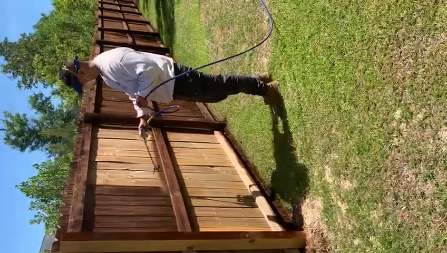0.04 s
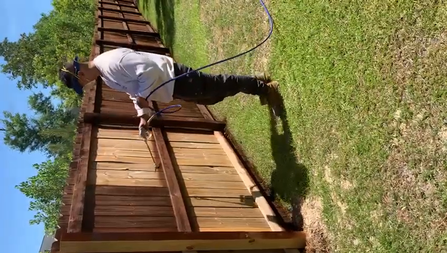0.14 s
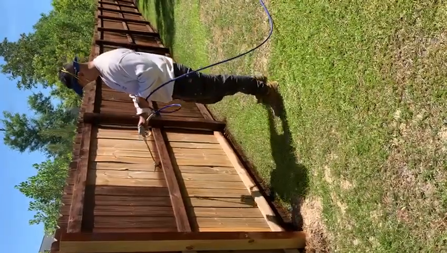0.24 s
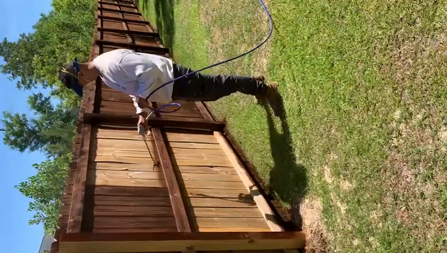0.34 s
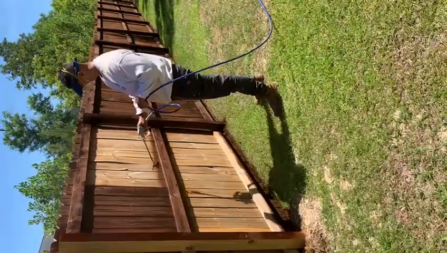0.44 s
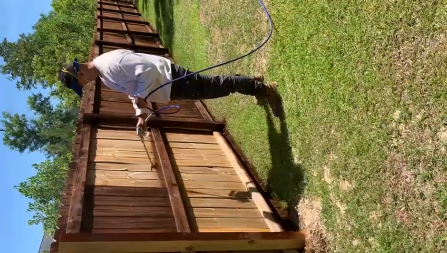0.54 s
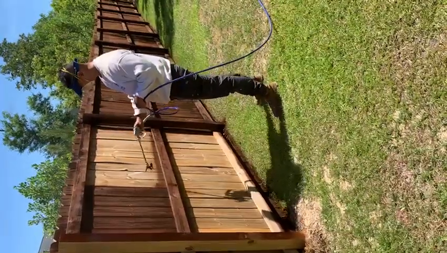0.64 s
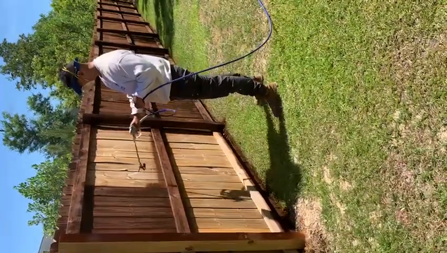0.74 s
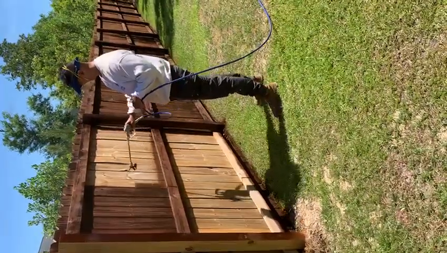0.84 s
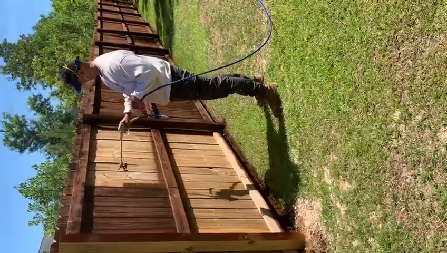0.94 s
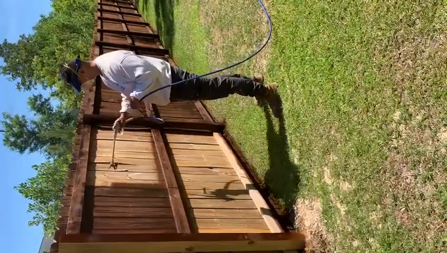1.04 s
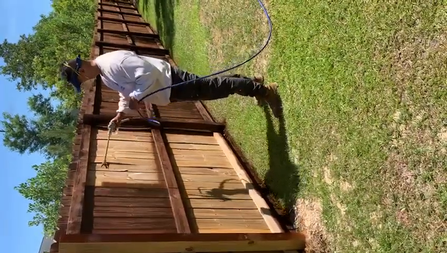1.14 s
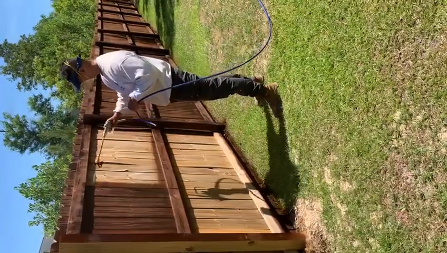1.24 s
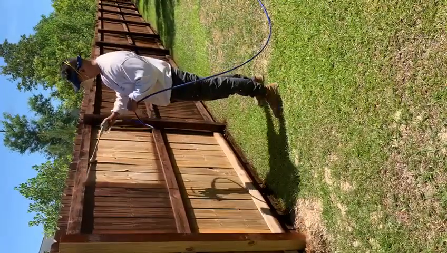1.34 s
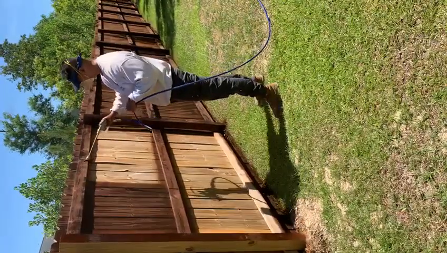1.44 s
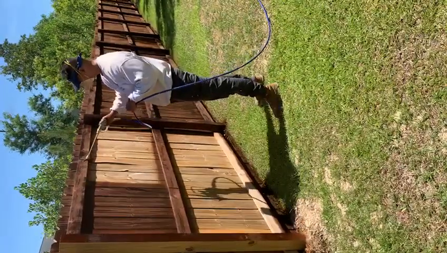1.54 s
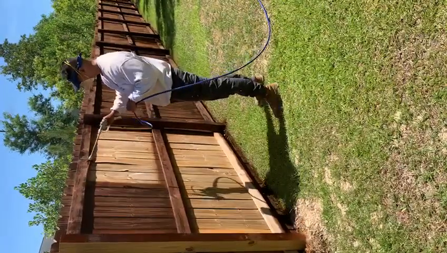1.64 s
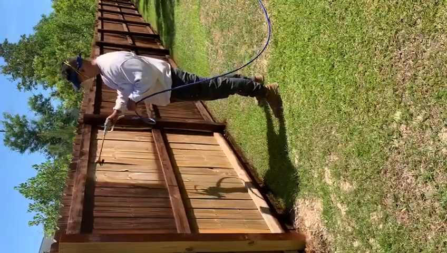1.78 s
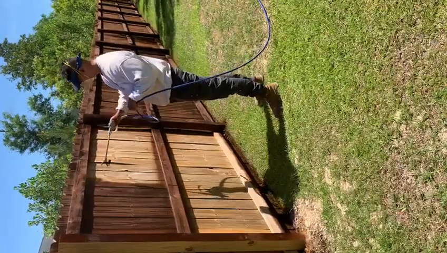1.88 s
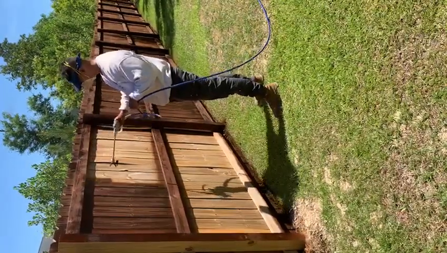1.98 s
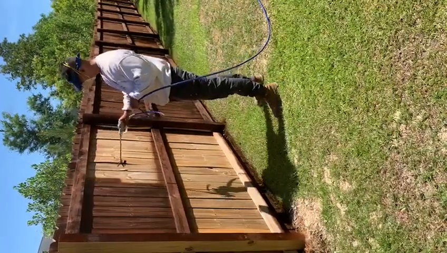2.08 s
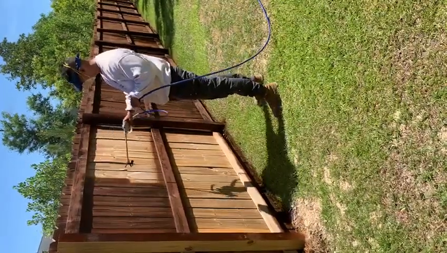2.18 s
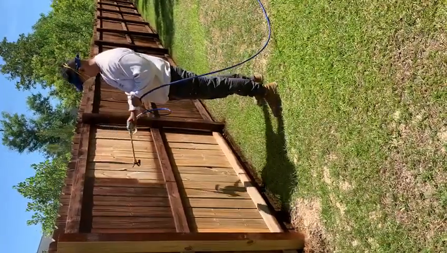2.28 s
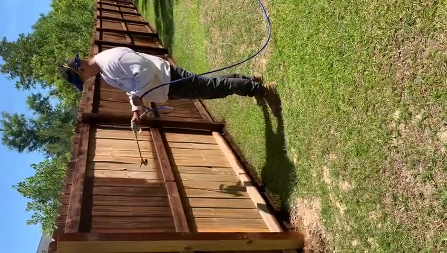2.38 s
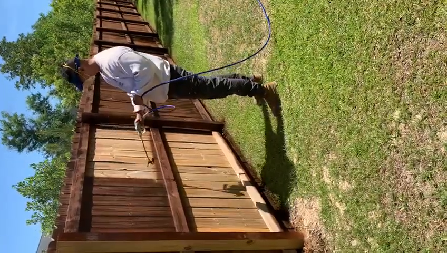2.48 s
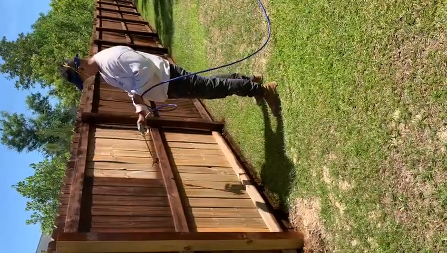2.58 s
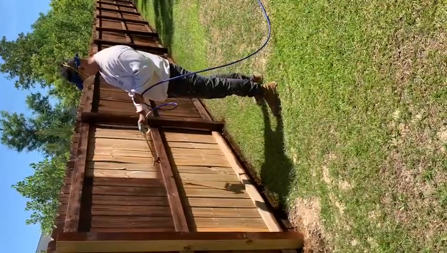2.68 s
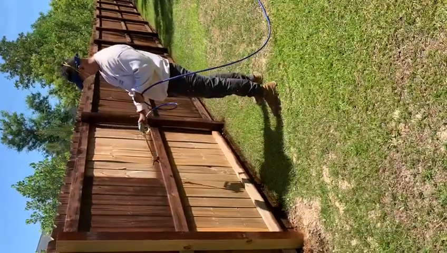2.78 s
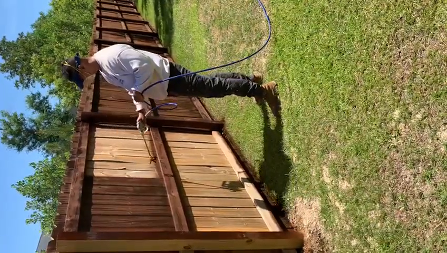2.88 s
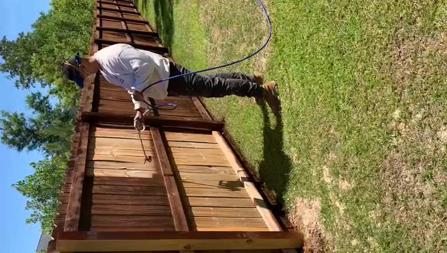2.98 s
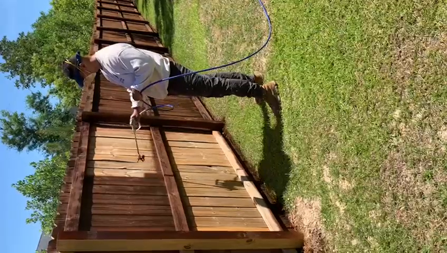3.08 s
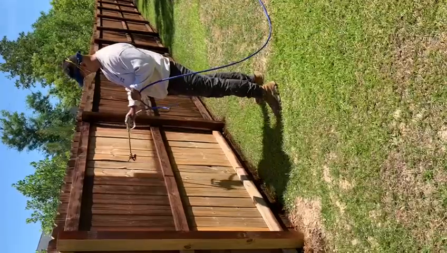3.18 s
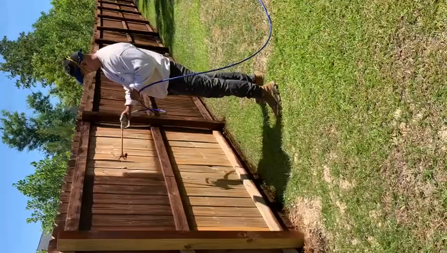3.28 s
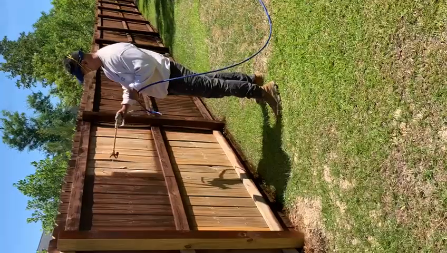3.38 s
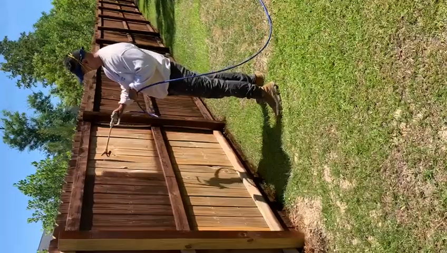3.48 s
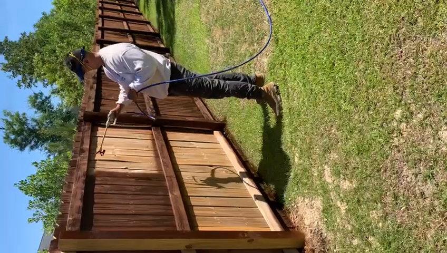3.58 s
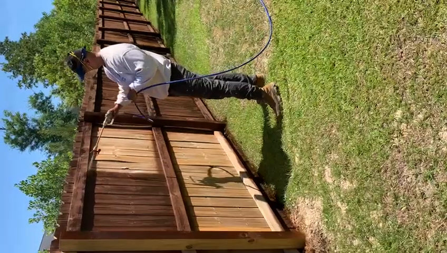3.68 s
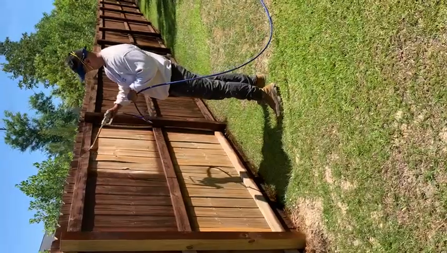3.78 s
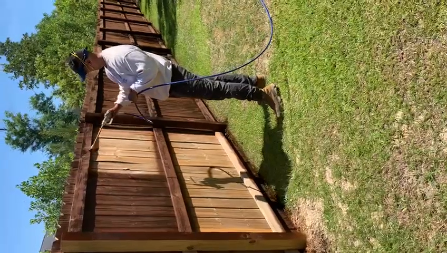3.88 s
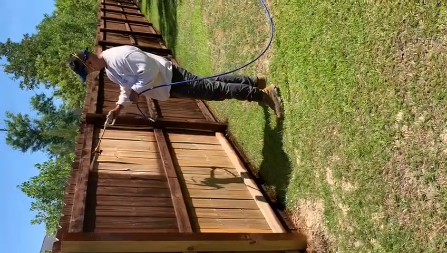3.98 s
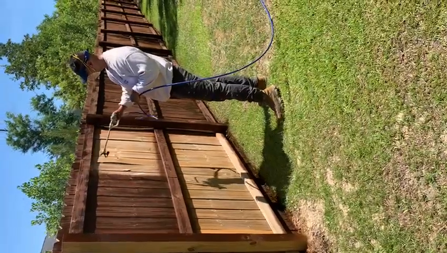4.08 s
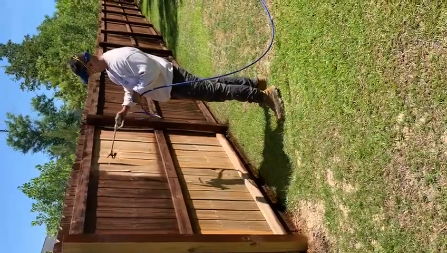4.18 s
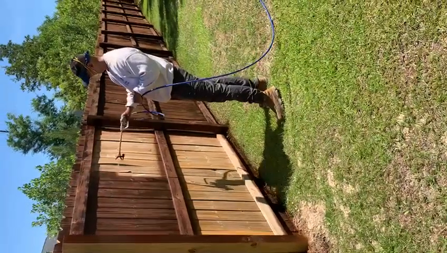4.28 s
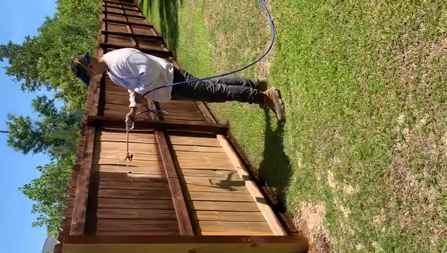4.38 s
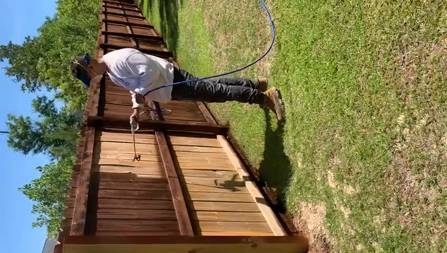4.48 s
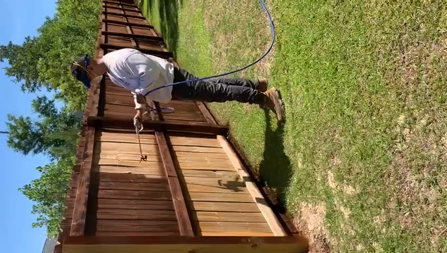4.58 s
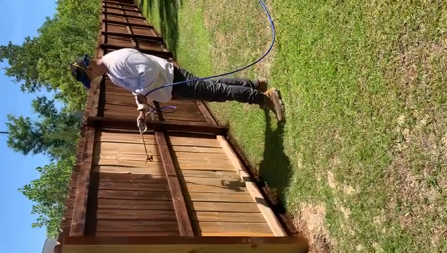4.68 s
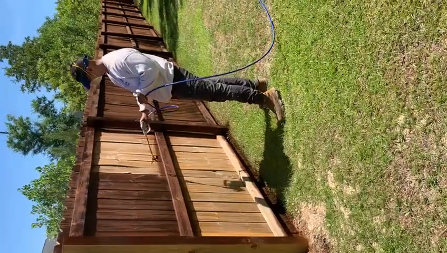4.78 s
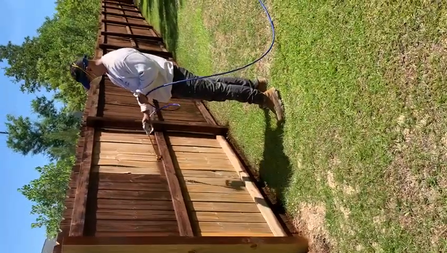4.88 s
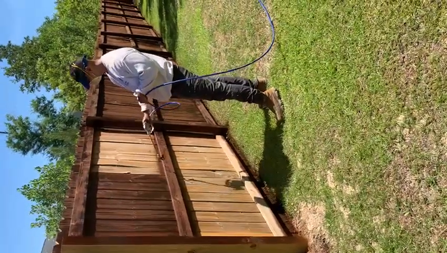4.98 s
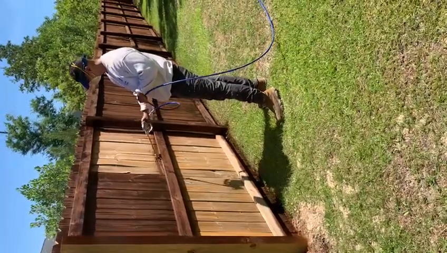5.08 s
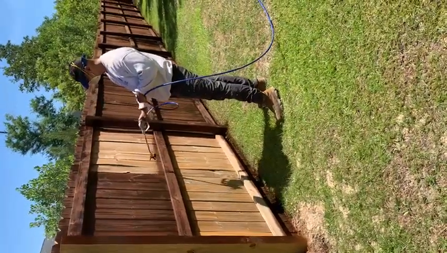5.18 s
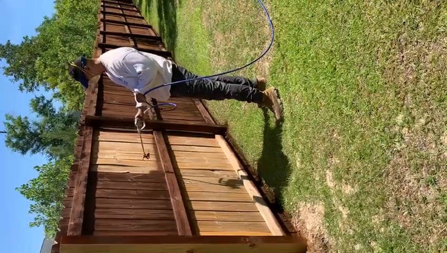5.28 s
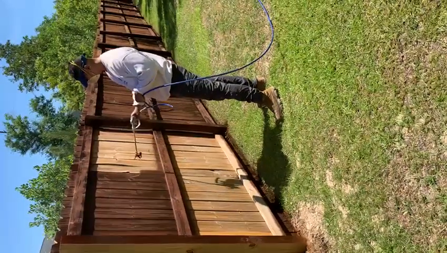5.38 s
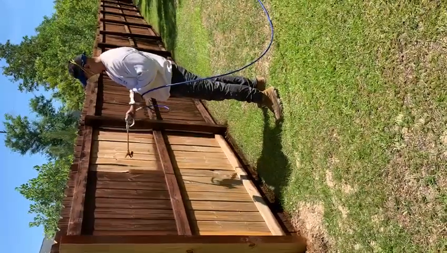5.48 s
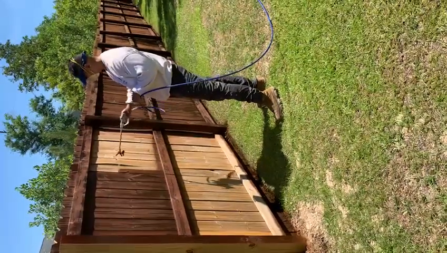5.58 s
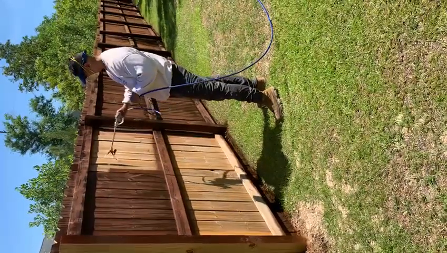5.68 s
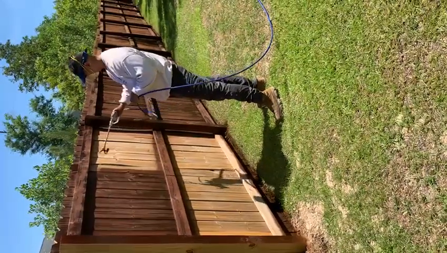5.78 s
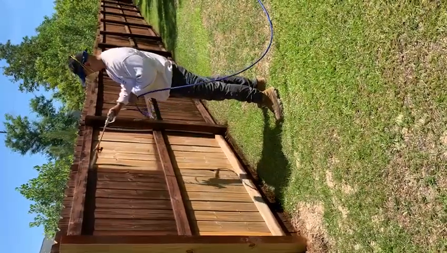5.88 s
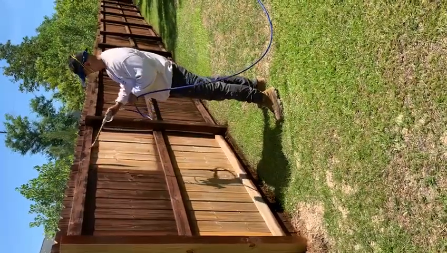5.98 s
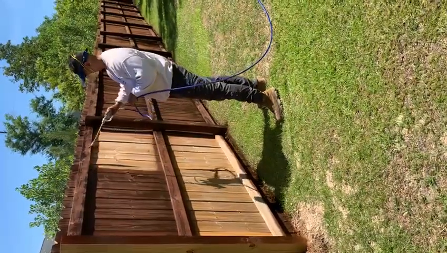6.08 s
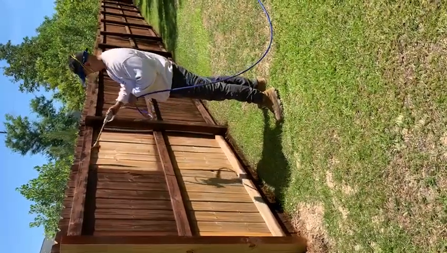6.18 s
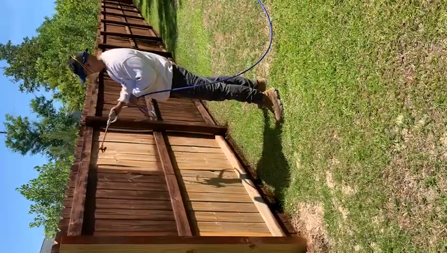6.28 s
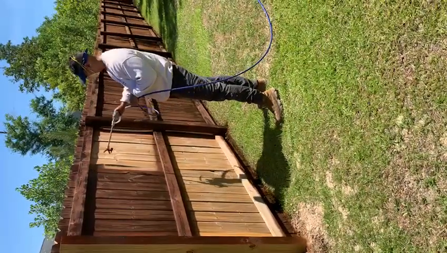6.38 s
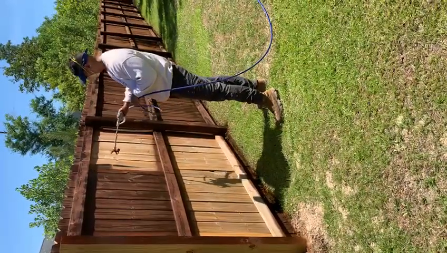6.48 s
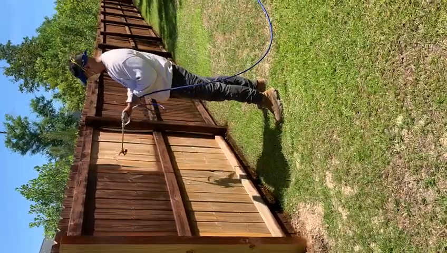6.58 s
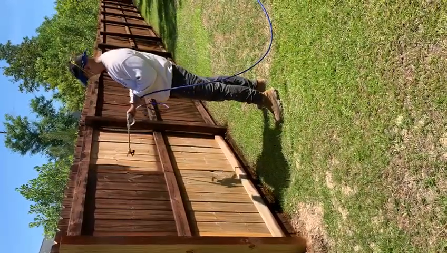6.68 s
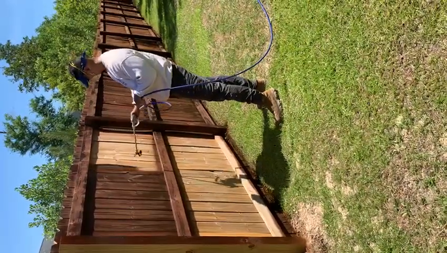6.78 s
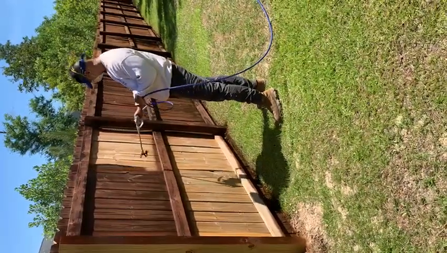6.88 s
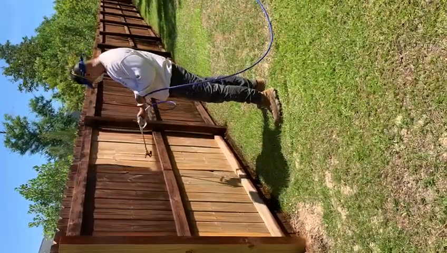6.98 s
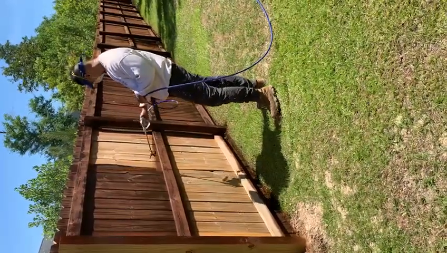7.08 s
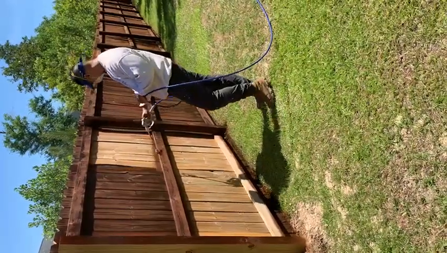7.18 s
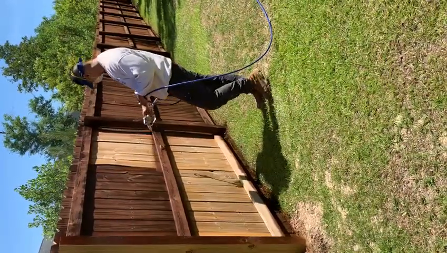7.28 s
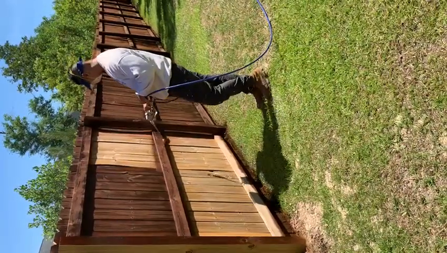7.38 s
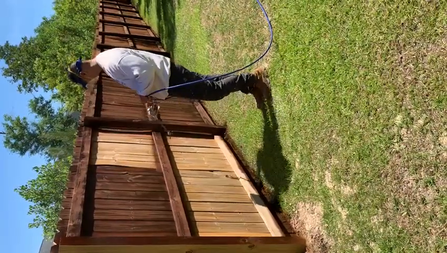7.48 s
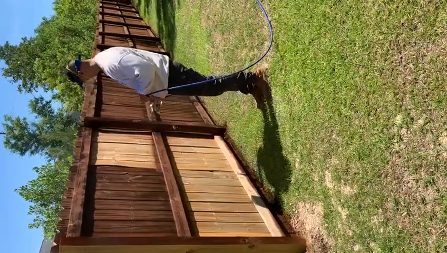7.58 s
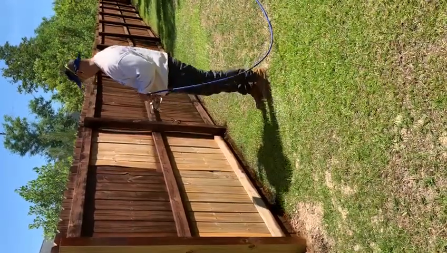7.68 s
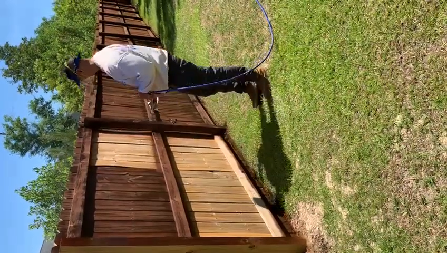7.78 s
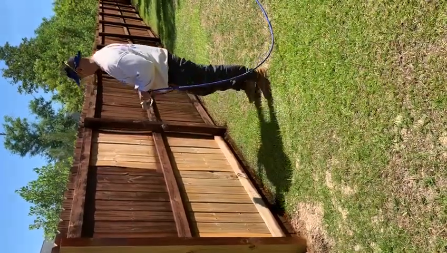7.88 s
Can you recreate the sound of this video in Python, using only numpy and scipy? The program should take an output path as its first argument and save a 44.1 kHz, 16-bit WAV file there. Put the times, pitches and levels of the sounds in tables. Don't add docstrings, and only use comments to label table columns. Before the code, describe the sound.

Outdoors on grass, heard by a nearby phone, a paint sprayer is just cutting off its hiss at 0.1 s. A quiet gap holds distant motor whine, low hum, wind rumble and faint bird chirps around 0.2 to 0.4. Bright, dense hisses follow at about 0.5-1.4, 1.65-2.55, 2.8-3.75, 4.0-4.85, 5.1-6.0 and 6.2-7.1 s, each opening with a small spit and closing abruptly. Under the hiss, boards patter with a hollow midrange note that slides as the wand sweeps, and posts rumble softly. Dry grass crunches and drags near 2.6, 5.0 and 6.05; a hose thuds softly at 2.87. After the last stroke, the trigger ticks lightly with a soft step near 7.2, a bird chirps at 7.35, the pump hum stops around 7.7, and a boot scuffs and lands at 7.83.

```python
import sys
import numpy as np
from scipy import signal
from scipy.fft import rfft, irfft, next_fast_len
from scipy.io import wavfile
from scipy.ndimage import uniform_filter1d

SR = 44100
rng = np.random.default_rng(int(sys.argv[2]) if len(sys.argv) > 2 else 0)


def voltage_ratio(level):
    return 10 ** (np.asarray(level, float) / 20)


def to_wav(s):
    ch = np.atleast_2d(s).T
    pcm = np.round(np.clip(ch, -1, 1) * 32767)
    wavfile.write(sys.argv[1], SR, pcm.astype(np.int16))


N = 350154
T = np.arange(N) / SR
HOP, SIZE = 128, 512

# [open t/s, shut t/s, tip hiss at open level/dB, at shut level/dB, boards drumming level/dB]
STROKES = [
    (0, .092, -37.5, -43.5, -59),
    (.508, 1.412, -39.5, -39, -45),
    (1.648, 2.558, -39, -38, -54.5),
    (2.808, 3.753, -41, -41.5, -44.5),
    (3.969, 4.836, -36.5, -40.5, -51.5),
    (5.078, 5.978, -39.5, -43, -46),
    (6.233, 7.107, -37.5, -40.5, -54),
]
# [lawn echo lag at open t/ms, at shut t/ms, mist below 8 kHz relative level/dB,
# posts rumbling level/dB, boards change by the end level/dB]
SWEEPS = [
    (2.2, 1.6, -3.5, -60, -4),
    (1.58, 2.6, -3.5, -60.5, 1),
    (3.4, 1.28, -5, -57, -2),
    (1.73, 3.5, -1.5, -54.5, -6.5),
    (3.5, 2, -6, -56.5, -6),
    (1.77, 3.12, -4.5, -54.5, -1),
    (3.22, 1.83, -5, -59.5, -2.5),
]
# [tip crosses rail t/s, board note before f/Hz, after f/Hz, fan opening t/s, surge level/dB]
RAIL = [
    (.05, 505, 470, .02, 0),
    (1.1, 538, 630, .015, -0.5),
    (2.13, 620, 535, 0.008, 1.5),
    (3.5, 523, 617, 0.0068, 1),
    (4.35, 572, 534, 0.0084, 1),
    (5.3, 586, 576, .012, -1.5),
    (6.6, 618, 470, 0.04, 1.5),
]
# [f/Hz, level/dB per Hz]
JET_SPECTRUM = [(150, -11), (300, -14.5), (600, -16.5), (900, -15), (1300, -13.5), (2000, -11), (3200, -10),
                (4500, -13), (6000, -7.5), (7500, -5), (9000, 0.5), (10300, 2), (11600, -3)]
# [f/Hz, level/dB per Hz]
AIR_SPECTRUM = [(25, -40), (50, -5.5), (85, -5), (150, -9.5), (300, -21), (600, -14), (850, -22),
                (1450, -23.5), (1900, -28), (2600, -30.5), (4000, -22), (5500, -31), (8000, -34),
                (11500, -38.5)]
# [f/Hz, width f/Hz, level/dB]
GEARS = [(1116.5, 77, 2.5), (1215, 55, 3), (1333, 42, 5.5), (1541, 91, 3.5)]
# [multiple of HUM_HZ, level/dB]
HUM = [(1, -69), (2, -72), (10, -76), (11, -80), (12, -72), (13, -64)]
# [t/s, whine level/dB]
EFFORT = [(0, -51.5), (.26, -66.5), (.5, -62.5), (.86, -48), (1.3, -48), (1.7, -53), (2.14, -52.5),
          (2.35, -48.5), (2.62, -52.5), (2.8, -52.5), (3.1, -49.5), (3.85, -55.5), (4.05, -51),
          (4.9, -56.5), (5.5, -49), (6.2, -54), (6.7, -52), (7.5, -61)]
# [t/s, level/dB]
GUSTS = [(0.0, -55.5), (0.88, -55), (1.13, -60.5), (1.3, -48.5), (1.35, -57), (1.64, -53.5), (2.39, -58.5),
         (2.56, -54.5), (4.25, -60), (4.31, -53.5), (4.38, -55.5), (5.79, -64), (5.88, -52), (6.26, -63.5),
         (6.96, -53), (7.21, -60.5), (7.85, -54), (7.94, -56)]
# [t/s, length t/s, first f/Hz, last f/Hz, level/dB]
BIRDS = [
    (.17, .07, 4300, 4200, -72),
    (.185, .07, 3750, 3650, -72),
    (.35, .045, 4400, 3950, -69),
    (3.86, .08, 4100, 3700, -73),
    (7.345, .035, 3800, 3720, -73),
]
# [t/s, crunch level/dB, crunch t60/s, drag level/dB, drag t60/s]
STEPS = [
    (2.596, -44, 0.11, -53, 0.39),
    (4.974, -44.5, 0.086, -55.5, 0.32),
    (6.06, -46.5, .06, -50.5, 0.19),
    (7.198, -57, 0.041, -60, 0.51),
]
# [f/Hz, width f/Hz, level/dB]
BLADES = [(3150, 700, 0), (5200, 900, -1), (7200, 900, -1)]
# [from t/s, to t/s, depth level/dB]
DUCKS = [
    (0.998, 1.2, -1.5),
    (3.462, 3.502, 10),
    (4.485, 4.557, 1.5),
    (5.647, 5.86, 1),
]
# [centre t/s, length t/s, depth level/dB]
SAGS = [(0.292, 0.44, 4), (0.692, 0.34, 2.5), (1.104, 0.38, 8.5), (1.384, .14, 4.5), (1.95, .3, 0.5),
        (3.402, 0.16, 3.5), (3.586, .2, -3), (4.178, 0.12, 3.5), (4.529, 0.21, 4.5), (4.674, .14, 3),
        (4.926, 0.11, 0.5), (5.213, 0.62, 3.5), (5.492, 0.16, -1.5), (5.754, 0.25, 3), (6.033, 0.074, 6),
        (6.264, .12, 5), (7.187, .04, 6.5), (7.235, .04, 6)]
# [f/Hz, left lead phase/rad, likeness 0-1, left minus right level/dB]
PORTS = [(60, .1, .98, 0), (120, .3, .95, -.5), (250, .6, .8, -1), (600, .5, .82, -.6),
         (1000, -.5, .7, -.6), (1500, -1.4, .7, -1.2), (2000, -1.6, .3, -2), (2600, -3, .65, -3.5),
         (3250, -4.9, .75, -3), (4000, -3.85, .95, -1), (4650, -3.14, .97, 0), (5300, -2.4, .97, 0),
         (6100, -.8, .97, 0), (6800, 0, .97, 0), (8900, 3.14, .97, 0), (11300, 6.28, .97, 0),
         (13000, 8.5, .97, 0)]

RAIL_S = 0.25
SURGE_S, SURGE_WIDE_S = 0.045, 0.017
TIP_RISE_DB, TIP_FLUTTER_DB = -7.0, .5
MIST_LATE_DB, MIST_LATE_S = -4.5, 0.14
WOOD_RISE_DB, WOOD_RISE_S, WOOD_FLUTTER_DB = -10.5, 0.017, 2
POST_ARCH_DB, SPLASH_FALL_DB = 1.5, -5.5
HUM_HZ, PUMP_OFF_S = 119.93, 7.73
CRUNCH_RISE_S, CRUNCH_HZ = 0.0016, (1300, 7600)
DRAG_LATE_S, DRAG_RISE_S, DRAG_HZ = 0.036, 0.022, (1200, 6000)
THUD_S, THUD = 2.87, (-45.5, 0.07, 0.2, 130, 256)
TICK_S, TICK = 7.18, (-60, -1.16, 0.4, 7903, 12397)
SCUFF_S, SCUFF = 7.833, [(-50, 0.022, .17, 4800, 14000), (-56.5, .022, .15, 1400, 3900),
                         (-50, .0003, 0.008, 1500, 12600), (-52.5, 0.027, 0.092, 400, 726)]
LET_GO_DB, LET_GO_S = 3, 0.068


def evened(x):
    return x / np.sqrt(np.mean(x ** 2) + 1e-20)


def read(points, hz):
    f, value = np.transpose(points)
    return np.interp(np.log(hz + 1), np.log(f + 1), value)


def coloured(points, patchy_db=0.):
    hz = np.fft.rfftfreq(2 * SIZE, 1 / SR)
    frames = N // (2 * HOP) + 5
    a, b, patches = rng.standard_normal((frames, len(hz), 2, 3)).T
    patches = uniform_filter1d(patches[0], size=12, axis=0)
    patches = evened(uniform_filter1d(patches, size=12, axis=1))
    z = (a + 1j * b) * voltage_ratio(read(points, hz)[:, None] + patchy_db * patches)
    return evened(signal.istft(z, nperseg=2 * SIZE, noverlap=2 * (SIZE - HOP))[1][:, :N])


def resonate(x, hz, width):
    r = np.exp(-np.pi * width / SR)
    if np.isscalar(hz):
        c = r * np.cos(2 * np.pi * hz / SR)
        return signal.lfilter([2 * (1 - r), -2 * (1 - r) * c], [1, -2 * c, r * r], x)
    turn = np.exp(2j * np.pi * np.cumsum(hz) / SR)
    return 2 * (turn * signal.lfilter([1 - r], [1, -r], x / turn + 1e-18)).real


def split(x, hz):
    low = signal.sosfiltfilt(signal.butter(6, hz, fs=SR, output="sos"), x)
    return low, x - low


def along(first, last):
    times = np.ravel([row[:2] for row in STROKES])
    return np.interp(T, times, np.ravel(np.transpose([first, last])))


def wander(size):
    once = uniform_filter1d(rng.standard_normal(N), size=size)
    return evened(uniform_filter1d(once, size=size))


def wand():
    opens, _, hiss_a, hiss_b, drum = np.transpose(STROKES)
    lag_a, lag_b, mist, post, tilt = np.transpose(SWEEPS)
    stroke = np.searchsorted(opens, T, "right").clip(1) - 1
    since = T - opens[stroke] + (stroke == 0)
    down = (lag_b < lag_a)[stroke]
    cross, before_hz, after_hz, opening, surge_db = np.transpose(RAIL)[:, stroke]
    note_hz = before_hz + (after_hz - before_hz) * np.clip(.5 + (T - cross) / RAIL_S, 0, 1)

    surge = np.exp(-((since - SURGE_S) / SURGE_WIDE_S) ** 2)
    hiss_db = along(hiss_a, hiss_b) + surge_db * surge + TIP_FLUTTER_DB * wander(size=1500)
    hiss_db = hiss_db + TIP_RISE_DB * np.exp(-since / opening)
    mist_db = mist[stroke] + MIST_LATE_DB * down * np.exp(-(since / MIST_LATE_S) ** 2)

    rise_db = WOOD_RISE_DB * np.exp(-since / WOOD_RISE_S)
    drum_db = along(drum, drum + tilt) + rise_db + WOOD_FLUTTER_DB * wander(size=1500)
    arch = np.sin(np.pi * along(0 * opens, 0 * opens + 1))
    post_db = post[stroke] + POST_ARCH_DB * (2 * arch - 1) + rise_db + WOOD_FLUTTER_DB * wander(size=1500)
    splash_db = SPLASH_FALL_DB * ~down * along(0 * opens - .5, 0 * opens + .5)
    return hiss_db, mist_db, drum_db, note_hz, post_db, splash_db


def lawn_echo(x, share):
    lag_a, lag_b = np.transpose(SWEEPS)[:2]
    late = np.arange(N) - along(lag_a, lag_b) * SR / 1000
    low = split(x, 2100)[0]
    return x + share * np.array([np.interp(late, np.arange(N), row) for row in low])


def trigger_valve():
    valve = 0
    for a, b, *_ in STROKES:
        valve = valve + np.clip((T - a) / .006 + (a == 0), 0, 1) * np.clip((b - T) / .008, 0, 1)
    spit = sum(np.exp(-abs(T - a - .006) / 0.019) for a, *_ in STROKES[1:])
    return valve * (1 + 0.27 * spit)


def paint_jet(hiss_db, mist_db, splash_db):
    mist, hiss = split(coloured(JET_SPECTRUM, patchy_db=1.6), 7900)
    splash, mist = split(mist, 4600)
    splash = voltage_ratio(0.83 * mist_db + splash_db + 3) * lawn_echo(splash, share=.5)
    return voltage_ratio(hiss_db + 6.5) * (hiss + voltage_ratio(mist_db + 6.0) * mist + splash)


def fence(drum_db, drum_hz, post_db):
    knocks = rng.standard_normal((N, 2, 2)).T
    boards = resonate(resonate(knocks[0], drum_hz, 120), drum_hz, 260)
    overtone = resonate(resonate(knocks[0], 1.27 * drum_hz, 260), 1.6 * drum_hz, 560)
    boards = voltage_ratio(drum_db - 1.5) * evened(boards + 0.14 * overtone)
    posts = voltage_ratio(post_db) * evened(resonate(resonate(knocks[1], 312, 180), 210, 230))
    return boards + posts


def sprayer():
    hiss_db, mist_db, drum_db, drum_hz, post_db, splash_db = wand()
    direct = trigger_valve() * (paint_jet(hiss_db, mist_db, splash_db) + fence(drum_db, drum_hz, post_db))
    tail = rng.standard_normal((8000, 2)).T * voltage_ratio(-60 * T[:8000] / .17)
    tail = tail / np.linalg.norm(tail[0])
    return direct + voltage_ratio(-12.5) * signal.oaconvolve(direct, tail, axes=1)[:, :N]


def pump():
    s, whine_db = np.transpose(EFFORT)
    noise = rng.standard_normal((N, 2)).T
    gears = evened(sum(voltage_ratio(db) * resonate(resonate(noise, hz, w), hz, 3 * w) for hz, w, db in GEARS))
    waver = voltage_ratio(1.8 * evened(uniform_filter1d(rng.standard_normal((N, len(HUM))), size=9000, axis=0))).T
    hum = 0
    for (k, db), w in zip(HUM, waver):
        hum = hum + np.sqrt(2) * voltage_ratio(db) * w * np.sin(2 * np.pi * k * HUM_HZ * T + k * k)
    running = np.clip((PUMP_OFF_S - T) / 0.025, 0, 1)
    whine = voltage_ratio(np.interp(T, s, whine_db) + 2.8 * wander(size=1200)) * gears
    return whine * (0.19 + 0.61 * running) + running * hum * [[1], [0]]


def yard():
    s, wind_db = np.transpose(GUSTS)
    wind = evened(resonate(resonate(rng.standard_normal((N, 2)).T, 74.7, 43), 78, 110))
    wind = split(wind, 42)[1]
    return voltage_ratio(-60.5) * coloured(AIR_SPECTRUM, patchy_db=2.5) + voltage_ratio(np.interp(T, s, wind_db) + 1.25) * wind


def birds():
    out = np.zeros(N)
    for s, length, a_hz, c_hz, db in BIRDS:
        u = np.clip((T - s) / length, 0, 1)
        middle_hz = (a_hz + c_hz) / 2 + 130
        hz = uniform_filter1d(np.interp(u, [0, .5, 1], [a_hz, middle_hz, c_hz]), size=600)
        out += voltage_ratio(db) * np.sin(np.pi * u) * np.sin(2 * np.pi * np.cumsum(hz) / SR)
    return out * [[1], [0]]


def steps():
    out = np.zeros((2, N))
    snap_db = 0.9 * np.minimum(rng.exponential(1, N // 60 + 1), 4).repeat(60)[:N]
    snaps = rng.standard_normal((N, 2)).T * voltage_ratio(snap_db)
    snaps = snaps + 1.6 * sum(voltage_ratio(db) * resonate(snaps, hz, width) for hz, width, db in BLADES)
    puffs = [(TICK_S, *TICK), (THUD_S, *THUD)] + [(SCUFF_S, *layer) for layer in SCUFF]
    for s, db, t60, drag_db, drag_t60 in STEPS:
        puffs.append((s, db, CRUNCH_RISE_S, t60, *CRUNCH_HZ))
        puffs.append((s + DRAG_LATE_S, drag_db, DRAG_RISE_S, drag_t60, *DRAG_HZ))
    for s, db, rise, t60, low_hz, high_hz in puffs:
        swell = np.exp(np.minimum(T - s, 0) / rise)
        fall = voltage_ratio(-60 * np.maximum(T - s, 0) / t60)
        shape = np.where(T < s, swell, fall)
        band = signal.butter(4, [low_hz, high_hz], "bandpass", fs=SR, output="sos")
        near = slice(round((s - .2) * SR), round((s + .6) * SR))
        out[:, near] += voltage_ratio(db) * shape[near] * evened(signal.sosfilt(band, snaps[:, near]))
    return out


def scene():
    return sprayer() + pump() + yard() + birds() + steps()


def microphone_ports(dry):
    size = next_fast_len(N)
    f = np.fft.rfftfreq(size, 1 / SR)
    hz, *columns = np.transpose(PORTS)
    lead, same, tilt_db = (np.interp(f, hz, c) for c in columns)
    same = np.clip(same, 0, 1)
    shared, own = rfft(dry, size)
    right = (same * shared + np.sqrt(1 - same ** 2) * own) * np.exp(-1j * lead)
    return irfft(np.array([shared * voltage_ratio(tilt_db / 2), right / voltage_ratio(tilt_db / 2)]), size)[:, :N]


def noise_reducer(pair):
    low, high = split(pair, 7900)
    duck_db = sum(db * (T > a) * (T < b) for a, b, db in DUCKS)
    duck_db = duck_db + sum(db * np.cos(np.pi * np.clip((T - s) / length, -.5, .5)) ** 2 for s, length, db in SAGS)
    duck_db = duck_db - LET_GO_DB * sum((T > s) * np.exp(-abs(T - s) / LET_GO_S) for s, *_ in STEPS)
    return high + low / voltage_ratio(uniform_filter1d(duck_db, size=150))


def empty_weak_bands(pair, mid_db, side_db, unrest_db, starve_db):
    shift = 338
    mid_side = np.pad([pair[0] + pair[1], pair[0] - pair[1]], ((0, 0), (shift, 0))) / 2
    hz, t, z = signal.stft(mid_side, SR, "cosine", nperseg=2048)
    band = np.floor(44 * np.log(1 + hz / 3000)).astype(int)
    starts = np.flatnonzero(np.diff(band, prepend=-1))
    power = np.add.reduceat(abs(z) ** 2, starts, axis=1)
    power_db = 10 * np.log10(uniform_filter1d(power, size=2, axis=2) + 1e-30)
    total_db = 10 * np.log10((abs(z) ** 2).sum((0, 1)) + 1e-30)

    jump = abs(np.diff(total_db, prepend=total_db[0])) > 7
    ducked = sum(abs(t - (a + b) / 2) < .03 for a, b, _ in DUCKS) > 0
    drift = evened(uniform_filter1d(rng.standard_normal((len(t), 2, 1)), size=12, axis=0))
    flutter = evened(uniform_filter1d(rng.standard_normal((len(t), 2, len(starts))), size=3, axis=0))
    allowed_db = np.array([mid_db, side_db])[:, None, None] + unrest_db * (drift + flutter).T.swapaxes(0, 1)
    allowed_db += 9 * jump + 7 * ducked * (hz[starts] > 10600)[:, None]
    low_spared_db = 8 * np.exp(-hz[starts] / 1600) + 26 * np.exp(-hz[starts] / 150)
    allowed_db += low_spared_db[:, None]

    keep = power_db > power_db[::-1] - allowed_db
    keep &= power_db > starve_db + 3 * flutter.T.swapaxes(0, 1)
    edge_hz = 11800 + 90 * flutter[:, 0, 0] + 550 * (jump | ducked)
    kept = z * keep[:, band] * (hz[:, None] < edge_hz)
    mid, side = signal.istft(kept, SR, "cosine", nperseg=2048)[1][:, shift:shift + N]
    return np.array([mid + side, mid - side])


def roll_off(x):
    return signal.sosfilt(signal.butter(12, 12890, fs=SR, output="sos"), x)


def record(dry):
    pair = noise_reducer(microphone_ports(dry))
    mix = empty_weak_bands(pair, mid_db=5, side_db=2.5, unrest_db=2.5, starve_db=-99)
    return roll_off(mix)


dry = scene()
out = record(dry)
to_wav(out)
```